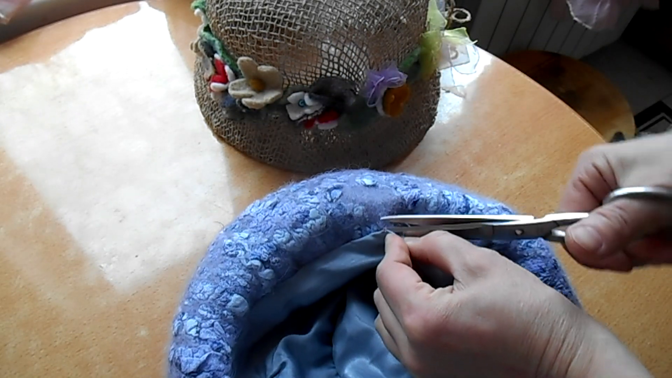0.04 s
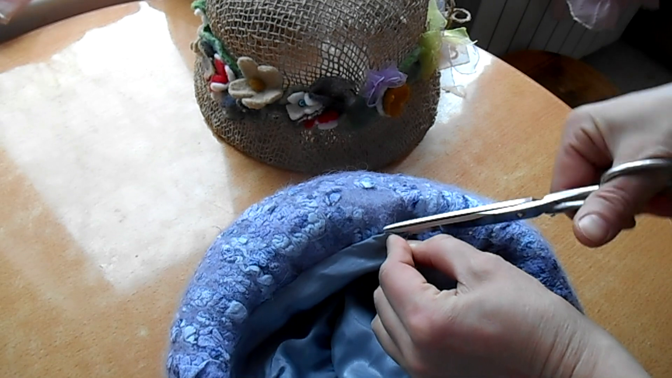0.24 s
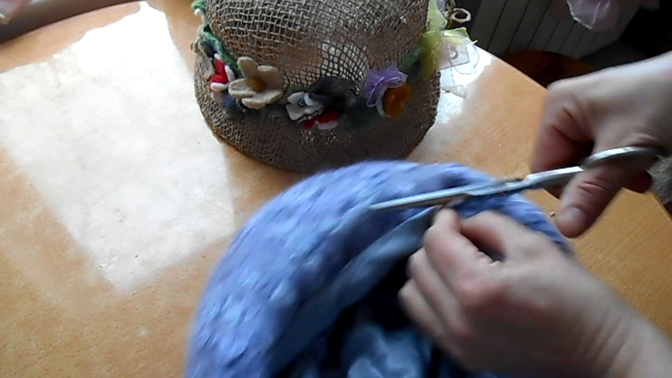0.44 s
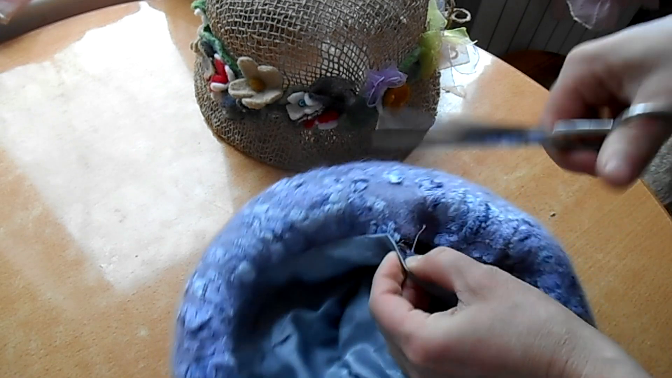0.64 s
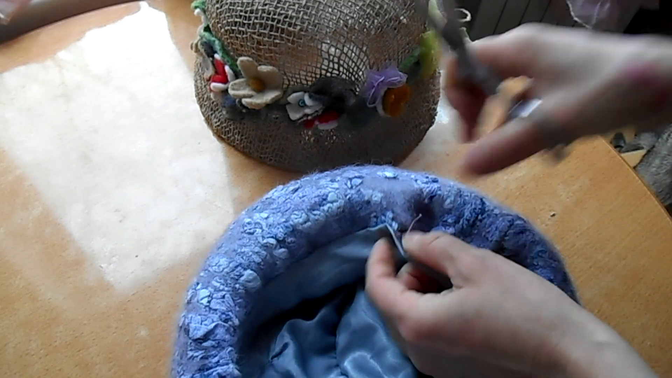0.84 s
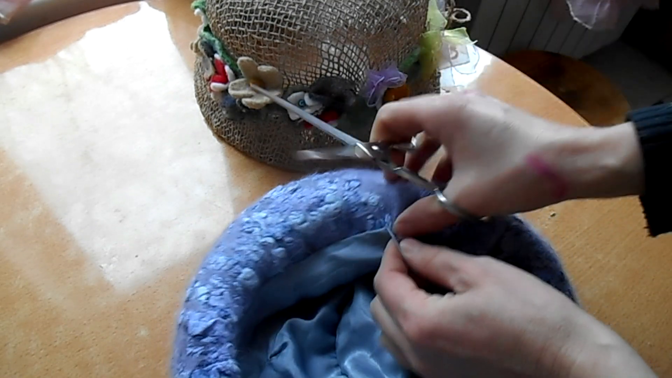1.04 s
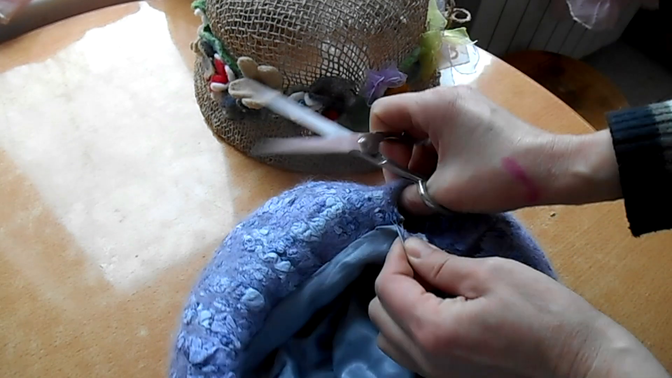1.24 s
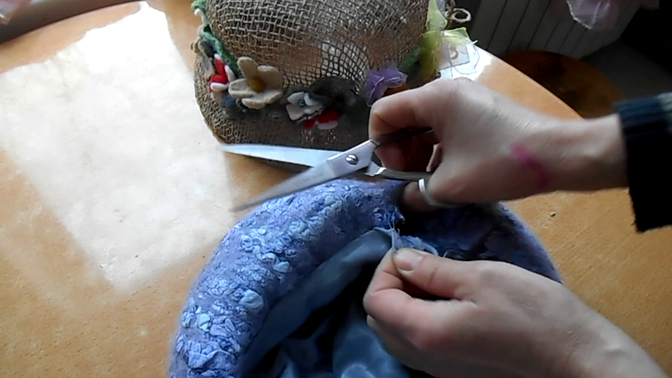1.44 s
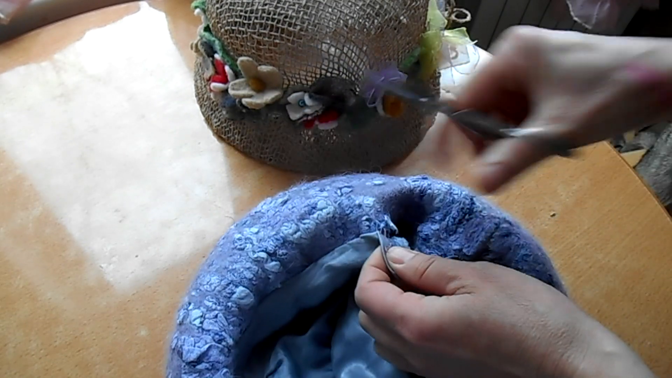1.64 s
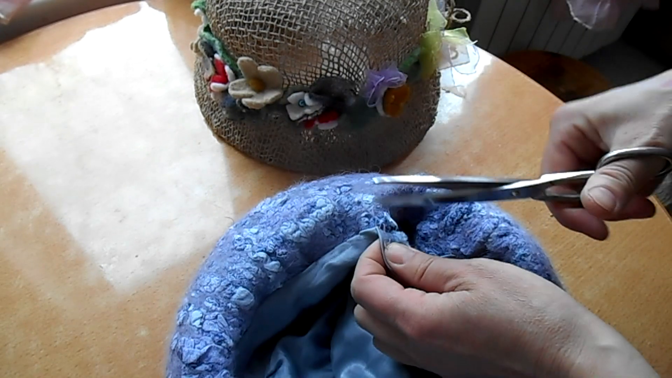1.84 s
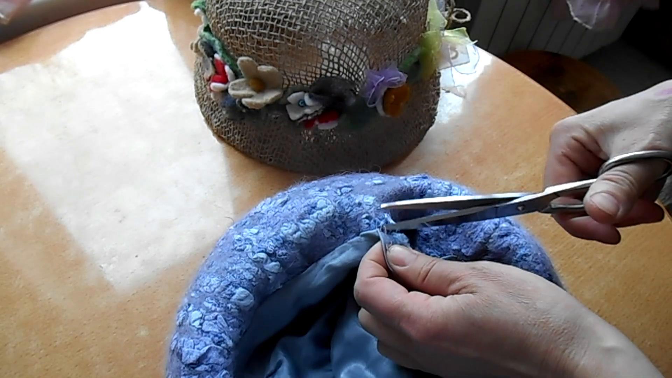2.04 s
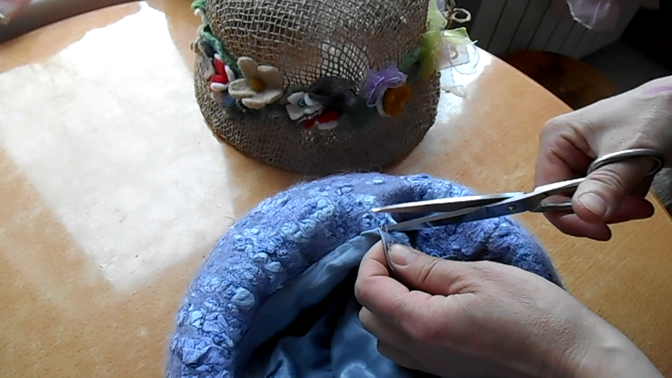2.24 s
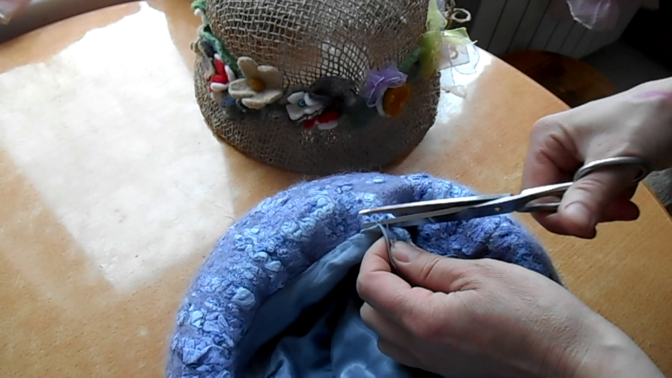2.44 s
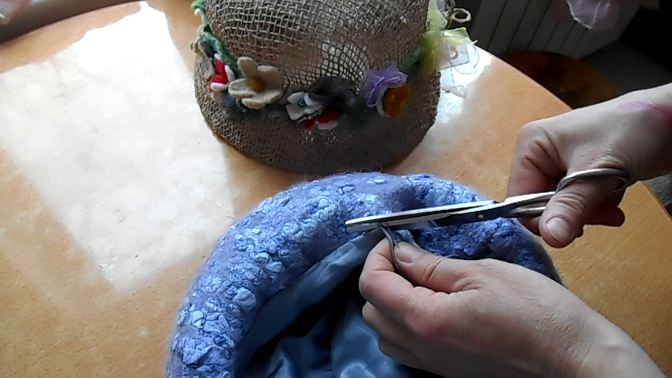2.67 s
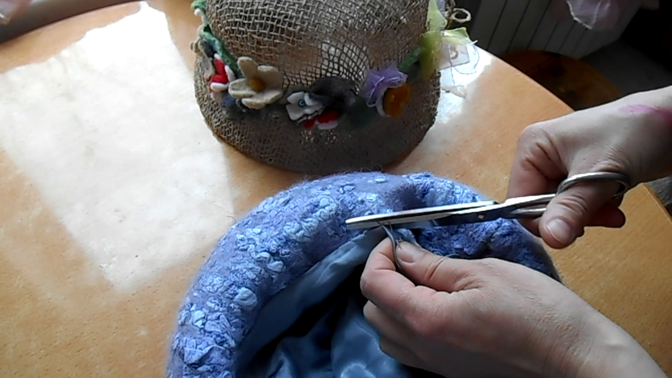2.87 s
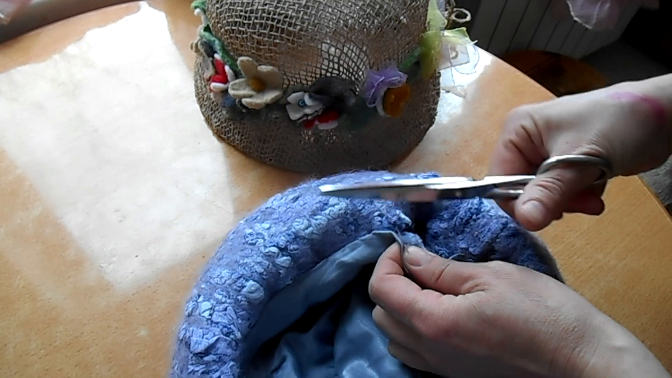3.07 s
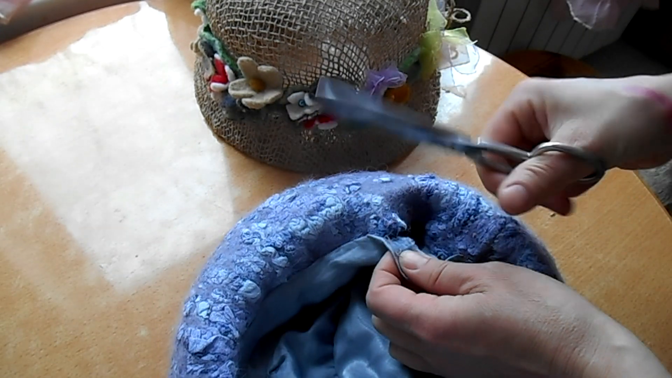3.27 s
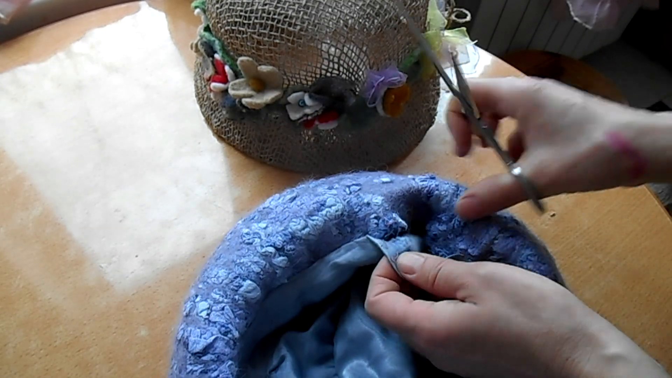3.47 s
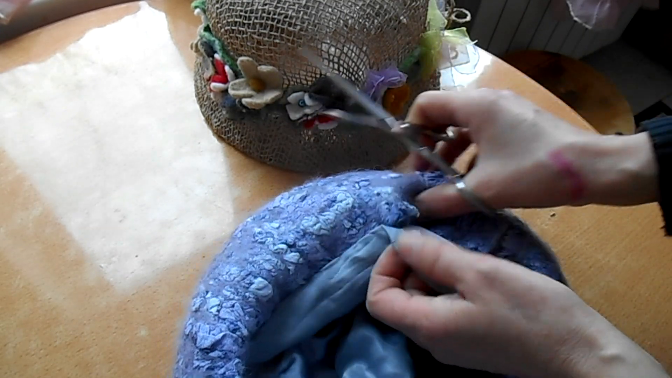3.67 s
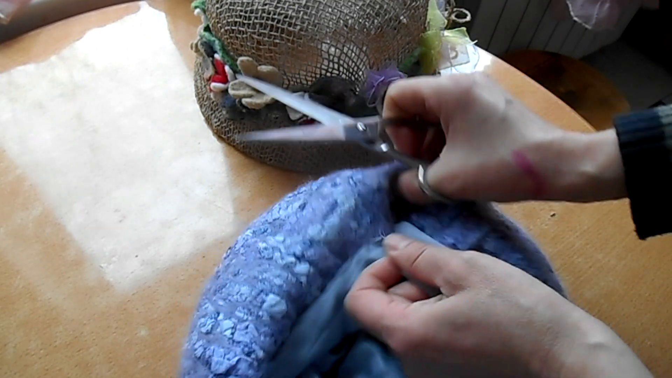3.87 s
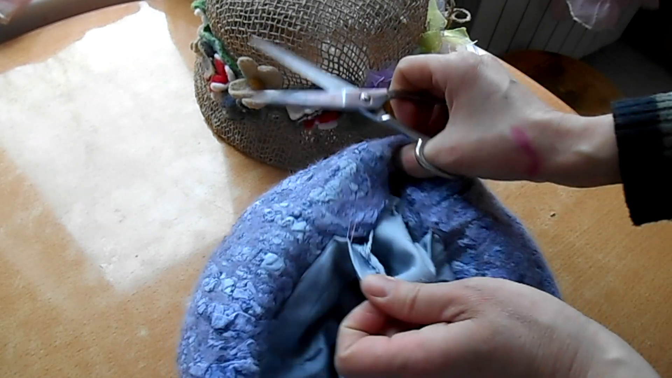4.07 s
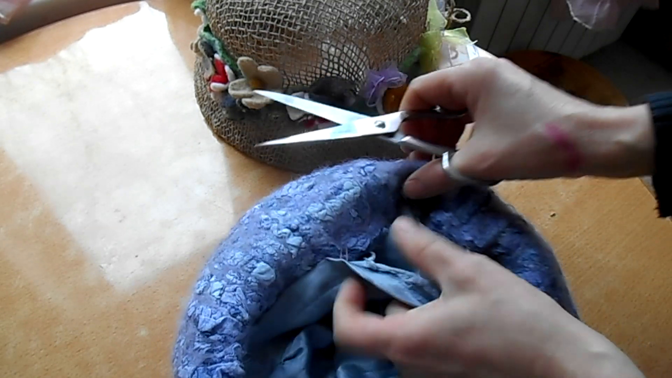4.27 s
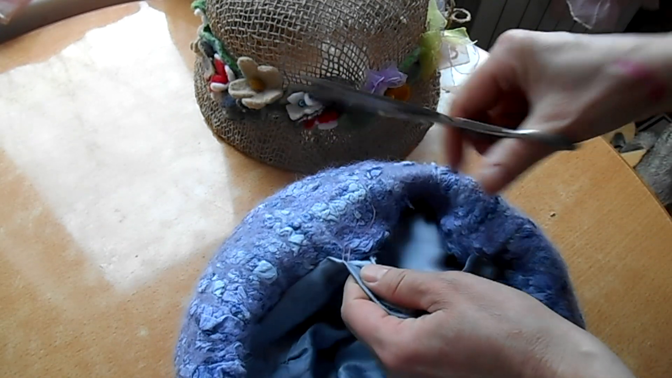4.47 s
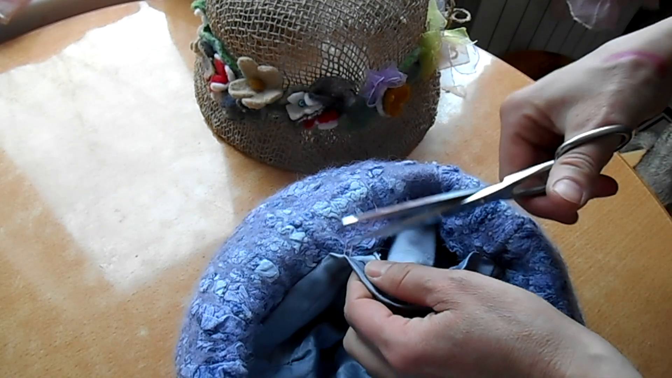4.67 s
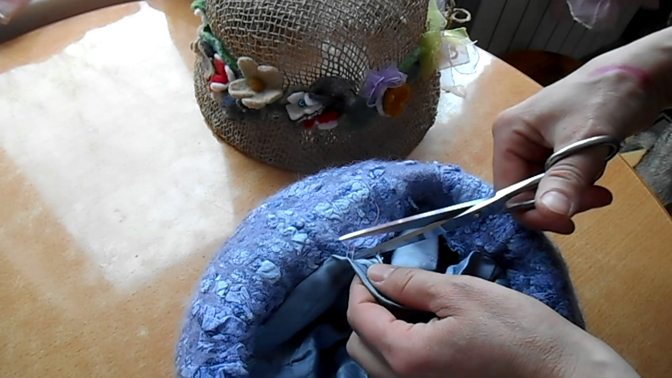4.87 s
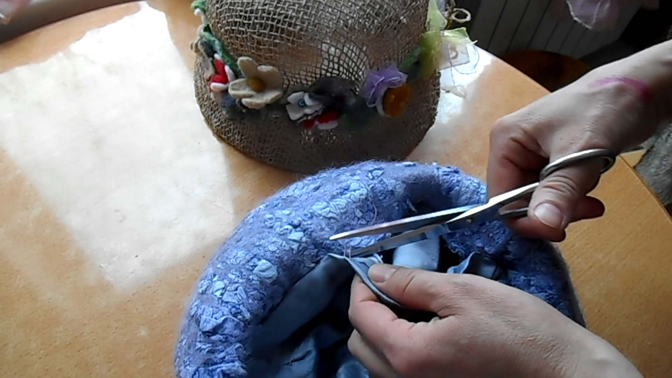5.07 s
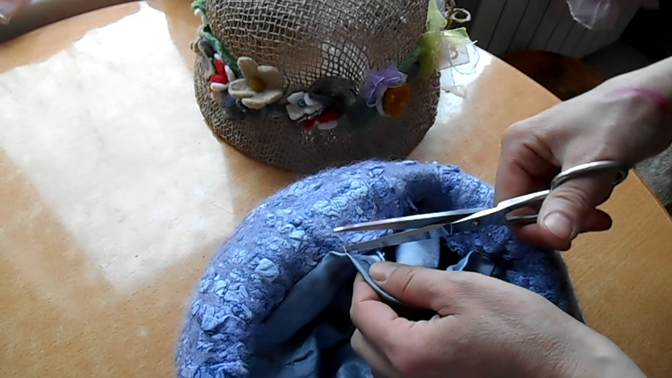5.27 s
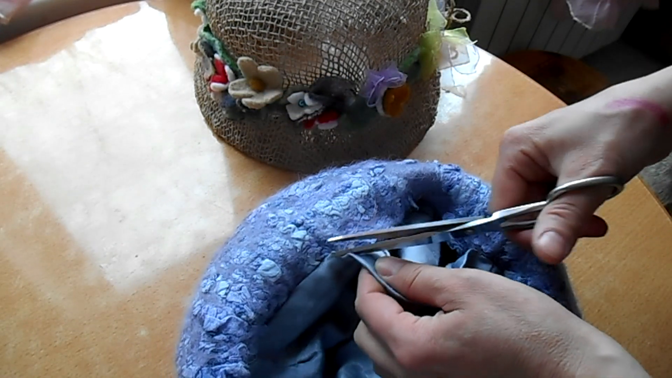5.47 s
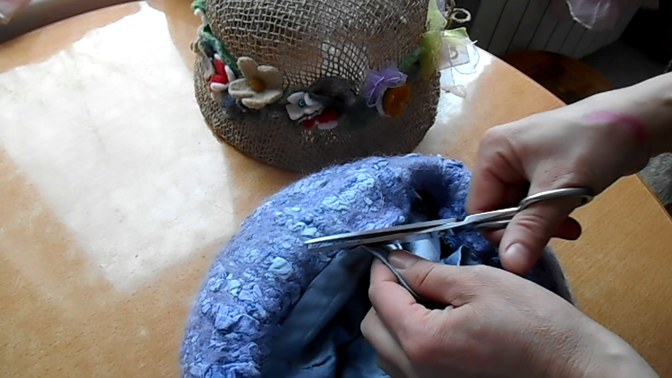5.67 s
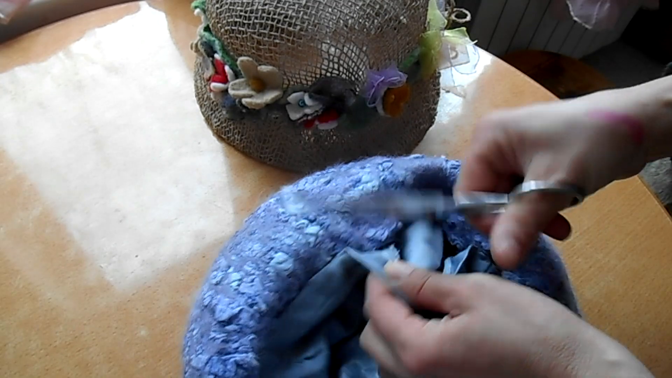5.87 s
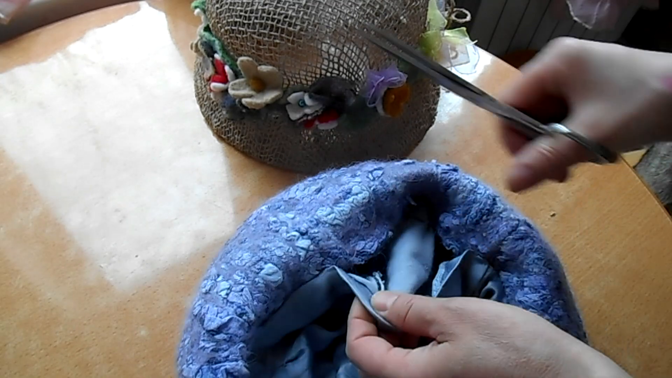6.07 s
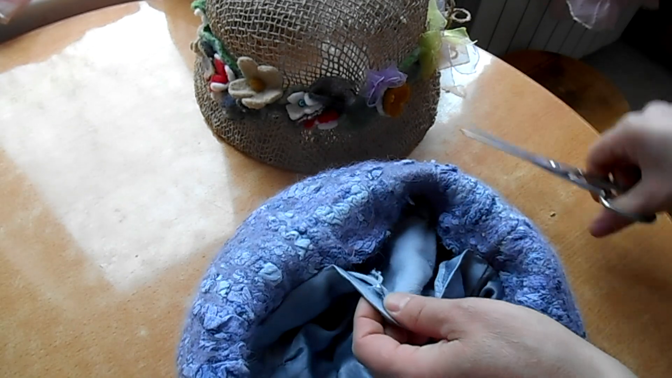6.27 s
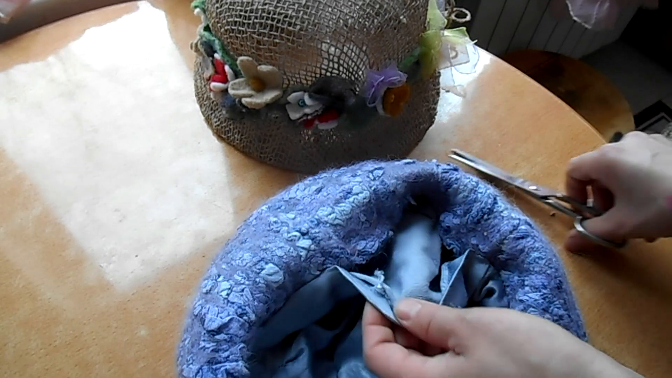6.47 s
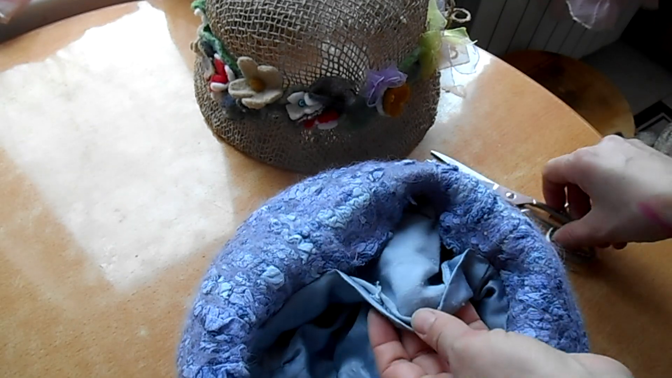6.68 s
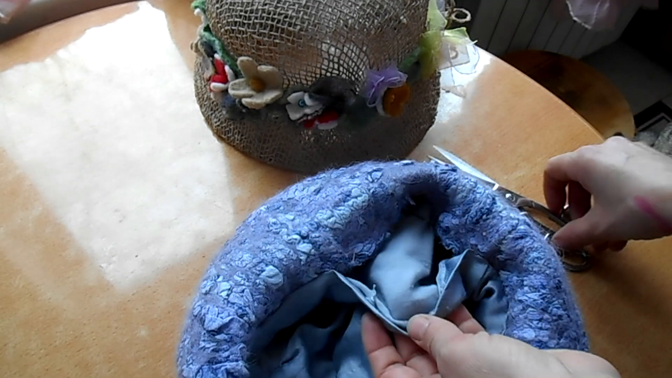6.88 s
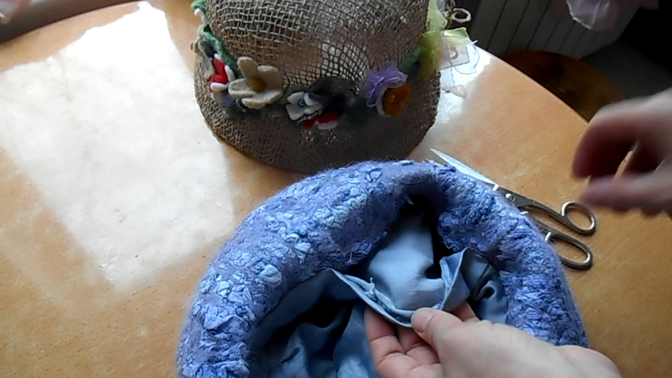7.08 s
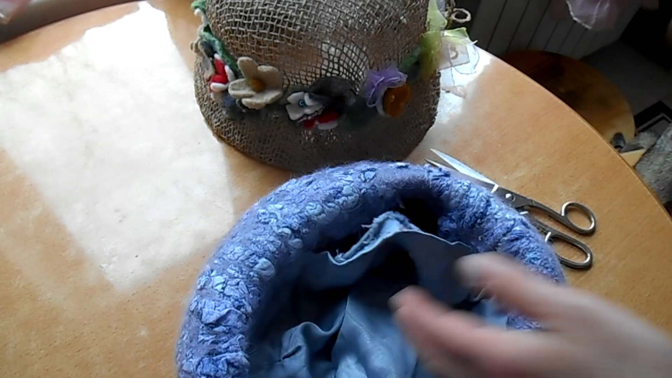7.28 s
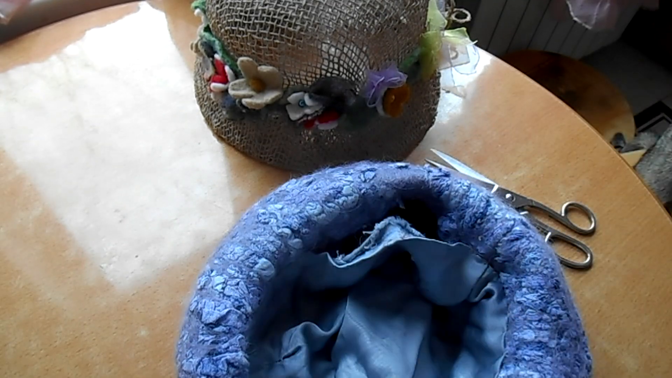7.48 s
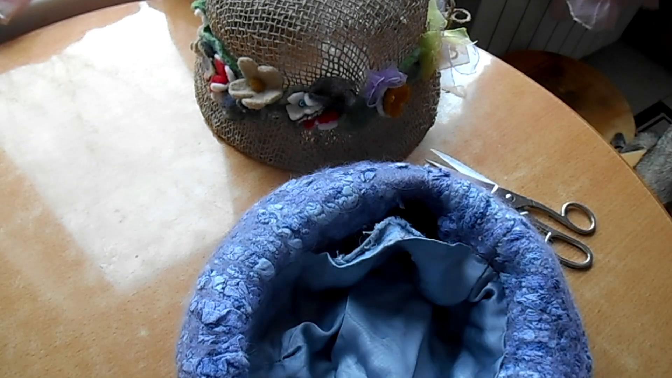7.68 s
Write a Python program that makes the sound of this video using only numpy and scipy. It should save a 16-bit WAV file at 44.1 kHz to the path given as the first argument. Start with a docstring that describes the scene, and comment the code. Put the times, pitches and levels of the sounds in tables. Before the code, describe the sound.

Close microphone, faint background hiss and hum, short indoor reflections. Three crisp scissor snips are spaced several seconds or so apart, with little metallic blade clicks, dry thread ticks, crackling cloth and short felt creaks between them. Finally the scissors are put down: a quick tapping rattle of the points, a light metal scrape, a hard steel-on-wood clack, then a dull scuff and faint rustle.

```python
"""Steel scissors cut the stitches of a felt hat's lining at a wooden table in a small quiet room.
Over a soft background hiss the blades snap shut three times; between the snips threads tick apart,
the loose blades click, and the cloth rustles and creaks in the hand: filtered noise and resonances.
Then the scissors are laid down: the tips bounce, steel slides, the handles drop with a loud clack
that rings decaying modes of steel and wood, and a soft scuff and a last rustle follow."""
import sys
import numpy as np
from scipy import signal
from scipy.fft import rfft, irfft
from scipy.io import wavfile

SR = 44100
rng = np.random.default_rng(int(sys.argv[2]) if len(sys.argv) > 2 else 0)


def dump_mix(stems):
    """Bounce the given channels to the path in sys.argv[1] as a 16-bit WAV at rate SR."""
    frames = np.atleast_2d(stems).T  # one column per channel
    limited = np.clip(frames, -1, 1)  # hard clip at full scale
    pcm = np.round(limited * 32767).astype(np.int16)
    wavfile.write(sys.argv[1], SR, pcm)


N = 340151
TIME = np.arange(N) / SR
RING_TIME = TIME[:SR // 2]  # half a second for each short sound


def undb(db):
    """Decibels to gain."""
    return 10 ** (np.asarray(db) / 20)


def unit(x):
    """Scale to rms 1."""
    return x / np.sqrt(np.mean(x ** 2))


def blow(x, db):
    """Scale a short sound so that its energy, packed into 10 ms, has this level."""
    return x * undb(db) * np.sqrt(SR / 100 / np.sum(x ** 2))


def add(out, s, x):
    """Mix a sound in at a time in seconds."""
    i = int(s * SR)
    out[i:i + len(x)] += x[:N - i]


def colour(x, points):
    """Causal minimum-phase filter through (frequency_hz, gain_db) points."""
    size = 4096
    hz, db = np.transpose(points)
    log_hz = np.log(np.fft.rfftfreq(size, 1 / SR) + 1)
    gain = undb(np.interp(log_hz, np.log(hz), db))
    # folding the cepstrum onto positive times makes the filter causal
    cepstrum = irfft(np.log(gain))[:size // 2]
    cepstrum[1:] *= 2
    impulse_response = irfft(np.exp(rfft(cepstrum, size)))
    return signal.fftconvolve(x, impulse_response)[:len(x)]


def resonate(x, hz, width_hz):
    """One resonance."""
    return signal.lfilter(*signal.iirpeak(hz, hz / width_hz, fs=SR), x)


def resonate_twice(x, hz, width_hz):
    """The same resonance applied twice, for steeper skirts."""
    return resonate(resonate(x, hz, width_hz), hz, width_hz)


def dull(x, hz, order=2):
    """Low-pass."""
    return signal.sosfilt(signal.butter(order, hz, fs=SR, output="sos"), x)


def no_bass(x, hz):
    """High-pass."""
    return signal.sosfilt(signal.butter(4, hz, "high", fs=SR, output="sos"), x)


def fade(t60):
    """Exponential decay, down 60 dB after t60 seconds."""
    return np.exp(-np.log(1000) * RING_TIME / t60)


def burst(t60):
    """Dying noise: a crowd of modes too dense to tell apart."""
    return rng.standard_normal(len(RING_TIME)) * fade(t60)


def ring(modes):
    """Struck modes; each contact point gives them other signs and slightly other pitches."""
    out = np.zeros(len(RING_TIME))
    for hz, db, t60 in modes:
        sign = rng.choice([-1, 1])
        pitch_hz = hz * (1 + .003 * rng.standard_normal())
        out += undb(db) * sign * fade(t60) * np.sin(2 * np.pi * pitch_hz * RING_TIME)
    return out


def contact(duration, grit):
    """A push followed by the tiny slips of two rough surfaces."""
    slips = rng.standard_normal(len(RING_TIME)) * np.exp(-(RING_TIME / duration) ** 2)
    return grit * blow(slips, 0) + blow(signal.unit_impulse(len(RING_TIME)), 0)


def swipe(duration):
    """Friction that swells and dies away, strongest two durations in."""
    return rng.standard_normal(len(RING_TIME)) * np.exp(-(RING_TIME / duration - 2) ** 2)


# every hand movement swells and dies alike: share of its length spent rising, dB under the peak at both ends
RISE_SHARE, EDGE_DB = .52, 18.5


def swell(peak_s, db, length):
    """Gain of one hand movement: an even rise in dB to its peak, then an even fall."""
    before = (peak_s - TIME) / RISE_SHARE
    after = (TIME - peak_s) / (1 - RISE_SHARE)
    away = np.maximum(before, after) / length
    return undb(db - EDGE_DB * np.minimum(away, 10))


def swells(rows):
    """Gain of several movements, whose powers add."""
    return np.sqrt(sum(swell(*row) ** 2 for row in rows))


def room(x, wet_db):
    """The table and near walls answer at once; the treble dies first."""
    tail = dull(burst(.4), 2800) * undb(-1.0) + burst(0.19)
    tail = tail * (1 - np.exp(-RING_TIME / 0.0012))  # soft onset
    tail = tail / np.sqrt(np.sum(tail ** 2))
    return x + undb(wet_db) * signal.fftconvolve(x, tail)[:N]


# tone of the background hiss: frequency_hz, gain_db
AIR_TONE = [(25, 2.5), (45, -0.5), (65, -0.5), (100, -5.5), (170, 2), (400, -3.5), (680, -6.5), (1000, 1),
            (1500, -3.5), (2200, -3), (2700, -2), (4400, -11.5), (8500, -13.5), (10500, -19.5),
            (12800, -26.5), (14000, -36.5), (15000, -48.5)]
# hums in the background: pitch_hz, width_hz (before widening), relative_level_db
BACKGROUND_HUMS = [(240.2, 21, -3.5), (532.3, 42.5, 2), (1118, 56, -1), (1470, 120, 0.5), (1793, 120, -1.5),
                   (2523, 120, -2.5), (3686, 80, -5), (11040, 70, -11.5)]


def air():
    """Steady background hiss with a few soft hums and a thin whine, all resonant or coloured noise."""
    hiss = unit(colour(rng.standard_normal(N), AIR_TONE))
    hums = np.zeros(N)
    for hz, width, db in BACKGROUND_HUMS:
        hums += undb(db) * unit(resonate_twice(rng.standard_normal(N), hz, 1.43 * width))
    return undb(-56.0) * hiss + undb(-65.5) * hums


# the hat shifts on the table: peak_s, level_db, length_s
HAT_SHIFTS = [(.15, -61, 0.22), (.39, -59, 0.73), (1.05, -67.5, 1.0), (1.78, -56, 0.43), (2.47, -54, 0.15)]


def rumble():
    """The hat shifts on the table with a low rumble."""
    low_noise = no_bass(dull(rng.standard_normal(N), 85, order=3), 22)
    return unit(low_noise) * swells(HAT_SHIFTS)


# the lining is drawn through the fingers or the blades: peak_s, level_db, length_s, crackle_share (0-1)
LINING_STROKES = [(0.66, -53.5, 0.25, 0.3), (.94, -56.5, .2, .3), (1.172, -51.5, .27, 0.4),
                  (1.33, -57, .2, .5), (1.558, -52.5, 0.21, 0.27), (1.87, -62.5, .3, .3),
                  (2.57, -54, .32, 0.74), (3.202, -59, 1.3, .3), (3.758, -51.5, 0.5, .1),
                  (3.91, -50.5, .2, 0.16), (4.084, -43.5, 0.29, 0.2), (4.27, -54.5, 0.27, 0.15),
                  (4.53, -54.5, 0.77, .1), (5.656, -48, 0.42, 0.64), (6.0, -58.5, 3.6, 0.15),
                  (7.455, -53.5, 1.4, 0.06)]
# tone of the rubbed lining: frequency_hz, gain_db
CLOTH_TONE = [(200, -5), (800, 2), (3000, -0.5), (4500, 0.5), (7000, 1.5), (9500, -5), (12000, -18),
              (15000, -26.5)]
CATCHES_PER_S = 450  # fibres that catch in the lining


def cloth():
    """Countless fibres slip as a soft hiss, while a few catch and crackle."""
    powers = np.array([swell(s, db, length) ** 2 for s, db, length, _ in LINING_STROKES])
    share = np.array([row[3] for row in LINING_STROKES])
    catches = (rng.random(N) < CATCHES_PER_S / SR) * rng.standard_normal(N)
    hiss = unit(colour(rng.standard_normal(N), CLOTH_TONE)) * np.sqrt((1 - share) @ powers)
    crackle = unit(colour(catches, CLOTH_TONE)) * np.sqrt(share @ powers)
    return hiss + crackle


# the stiff felt and lace creak when pulled: peak_s, level_db, length_s
FELT_PULLS = [(.382, -44, .009), (.61, -59, .4), (4.005, -44.5, 0.15), (4.05, -43.5, .05),
              (4.12, -48, 0.062), (4.28, -56.5, 1.0), (5.65, -58, 0.37), (5.82, -46.5, .06)]
# tone of the creak: frequency_hz, gain_db
CREAK_TONE = [(100, -15), (300, -3), (800, 1.5), (1400, -2.5), (2200, -7), (3000, 3), (3800, -10.5),
              (8000, -25), (15000, -40)]
SLIPS_PER_S = 2500


def creak():
    """Dense little slips in the pulled felt."""
    slips = (rng.random(N) < SLIPS_PER_S / SR) * rng.standard_normal(N)
    return unit(colour(slips, CREAK_TONE)) * swells(FELT_PULLS)


# threads part: start_s, level_db, duration_s
THREAD_TICKS = [(1.199, -50, .001), (1.2368, -39, 0.0007), (1.293, -45, 0.00055), (1.303, -43.5, 0.0009),
                (1.3345, -34, 0.00066), (1.3683, -41, 0.0009), (2.482, -54.5, 0.0023), (2.755, -48, 0.0059),
                (3.993, -43, 0.0006), (4.049, -44.5, 0.004), (5.561, -46.5, 0.0023), (5.636, -43.5, 0.0012),
                (5.655, -46, 0.0014)]
# tone of a parting thread: frequency_hz, gain_db
THREAD_TONE = [(200, -17), (1000, -4), (3000, 2.5), (6200, 4), (9000, -0.5), (12000, -15), (15000, -25)]


def threads():
    """Each thread gives way with one dry tick."""
    out = np.zeros(N)
    for s, db, duration in THREAD_TICKS:
        tick = colour(contact(duration, grit=0.73), THREAD_TONE)
        add(out, s, blow(tick, db))
    return out


# loose blades rub and click: peak_s, level_db, main_ring_hz, main_ring_gain_db, contact_s
BLADE_CLICKS = [(0.429, -41.5, 6900, -6, 0.0038), (.466, -38, 7350, 1, 0.00071),
                (.625, -52, 2920, 10, 0.0084), (.663, -43.5, 4600, 0, .008),
                (1.767, -48.5, 9770, -2, 0.0061), (3.02, -40.5, 3200, -2, 0.00069),
                (3.291, -50, 4470, 2, .003), (3.496, -48.5, 9800, -4, 0.0055),
                (5.8188, -40, 5900, -9, 0.0041), (5.875, -47, 4100, 3, 0.00069),
                (6.014, -46.5, 7100, 4, 0.0037)]
# free ring of the steel, also heard in the knocks and the slide: pitch_hz, gain_db, t60_s
STEEL_MODES = [(2525, 1, .3), (2674, -8, 0.32), (3660, 5, 0.19), (3800, 0, .22), (5300, -0.5, .2),
               (6210, -3, .2), (6350, -4.5, .15), (7670, -3.5, .2), (8270, -5.5, .2), (9940, -1.5, 0.092),
               (10300, -7.5, .18), (11400, -9.5, 0.093), (12200, -12.5, .15)]
# tone of struck or rubbed steel: frequency_hz, gain_db
STEEL_TONE = [(600, -19.5), (2100, -18), (2600, 6.5), (3200, -6), (3800, 0.5), (4600, -6), (6300, 0),
              (8300, -3), (9000, -10), (9900, -3), (11100, -18.5), (12200, -9.5), (15000, -42)]


def pivot():
    """Slack blades scrape and tap each other, ringing lightly."""
    out = np.zeros(N)
    for s, db, hz, main_db, duration in BLADE_CLICKS:
        force = swipe(duration)
        tap = blow(colour(force, STEEL_TONE), 0) + blow(resonate_twice(force, hz, 600), main_db)
        modes = ring(STEEL_MODES) + 2.8 * ring([(7750, 0, .16)])
        singing = signal.fftconvolve(force, modes)[:len(force)]
        add(out, s - 2 * duration, blow(tap, db) + blow(singing, db - 9.5))
    return out


# the tips touch the table and bounce, each flight shorter than the last
TIPS_S, FIRST_FLIGHT_S, RESTITUTION = 6.4564, .0525, .67
TIP_STEEL_DB, TIP_BOARD_DB, TIP_THUMP_DB, TIP_TOP_HZ = -14.5, -30, -25, 1590
STEEL_LOSS_DB, WOOD_LOSS_DB = 8, 6.5  # lost each time the number of contacts doubles


def bounces(count):
    """The knocks of the bouncing tips, ever closer and weaker."""
    rows, s = [], TIPS_S
    for k in range(count):
        doublings = np.log2(k + 1)
        steel_db = TIP_STEEL_DB - doublings * STEEL_LOSS_DB
        wood_loss = doublings * WOOD_LOSS_DB
        rows.append((s, steel_db, TIP_BOARD_DB - wood_loss, TIP_THUMP_DB - wood_loss, TIP_TOP_HZ))
        s += FIRST_FLIGHT_S * RESTITUTION ** k
    return rows


# the handles drop and settle: start_s, steel_db, board_db, thump_db, board_top_hz
HANDLE_KNOCKS = [(6.8025, -26, -15.5, -21, 1530), (6.8207, -32.5, -14.5, -45, 1520),
                 (6.8314, -8, -5.5, -24, 6100), (6.864, -25.5, -17, -38, 5000),
                 (6.900, -45, -30, -36, 4000), (6.993, -50, -38.5, -38, 2000)]
# table top bending as a whole: pitch_hz, gain_db, t60_s
THUMP_MODES = [(146, -12.5, 0.42), (168, -14.5, 0.32), (243.3, -5, 0.25), (273.8, 0, 0.35), (310, -8, 0.11),
               (376.5, -3, 0.35), (403, -7.5, 0.26)]
# stiff upper modes of the table top: pitch_hz, gain_db, t60_s
BOARD_MODES = [(684, -7, 0.31), (834, -4.5, 0.16), (862, -3.5, 0.36), (996, -8, 0.43), (1180, 1.5, 0.18),
               (1244, -1, 0.18), (1370, -4, 0.18), (1464, -2.5, 0.22), (1570, -4.5, .22),
               (1644, -0.5, 0.18), (2003, 3.5, 0.16), (2310, -6, .17), (2610, 3, 0.089), (2770, 5, 0.18),
               (3380, 1, 0.28), (4230, -8, 0.13), (6030, 8.5, 0.079)]
# tone of the wood, also heard in the scuff: frequency_hz, gain_db
BOARD_TONE = [(150, -20.5), (550, -16), (720, -1), (1400, 3.5), (1800, -1.5), (2700, 1), (5500, 3),
              (8000, -17), (14000, -18)]


def knocks():
    """Every knock rings steel and wood; a harder contact reaches higher modes of the board."""
    out = np.zeros(N)
    for s, steel_db, board_db, thump_db, top_hz in bounces(count=6) + HANDLE_KNOCKS:
        # chatter against the wood smears each steel mode into a narrow band
        clank = np.zeros(len(RING_TIME))
        for hz, db, t60 in STEEL_MODES:
            clank += undb(db) * blow(resonate_twice(burst(t60), hz, 260), 0)
        steel = blow(clank, -7)
        steel += blow(colour(burst(0.022), STEEL_TONE), -2.5)
        steel += blow(colour(burst(0.23), STEEL_TONE), -12.5)
        board = blow(ring(BOARD_MODES), -7.5) + blow(colour(burst(0.17), BOARD_TONE), 1.5)
        wood = blow(dull(board, top_hz, order=3), board_db) + blow(ring(THUMP_MODES), thump_db)
        add(out, s, undb(steel_db) * steel + no_bass(wood, 113))
    # once the hand lets go, the hardest knock sets the blade tips singing
    hardest = max(HANDLE_KNOCKS, key=lambda row: row[1])
    tips = ring([(7666, 1.5, 0.09), (9850, -4.5, .06), (12150, -7.5, 0.055)])
    add(out, hardest[0], blow(tips, -11.5))
    return out


# steel slides on the table: peak_s, level_db (before the two parts are mixed), length_s
STEEL_SLIDES = [(6.665, -41.5, 0.22)]


def slide():
    """Sliding on the wood keeps the steel ringing."""
    scrape = rng.standard_normal(N)
    rub = unit(colour(scrape, STEEL_TONE))
    singing = unit(signal.fftconvolve(scrape, ring(STEEL_MODES))[:N])
    return (undb(-2) * rub + undb(-3) * singing) * swells(STEEL_SLIDES)


# a soft scuff on wood: peak_s, level_db, length_s
WOOD_SCUFFS = [(7.647, -43.5, 0.13)]


def scuff():
    """Dull friction noise with the tone of the wood."""
    friction = colour(rng.standard_normal(N), BOARD_TONE)
    return unit(dull(friction, 1800, order=1)) * swells(WOOD_SCUFFS)


# blades snap shut: start_s, level_db, lowest_resonance_hz, its_gain_db, brightness_top_hz,
# ring_db (relative to level_db), contact_s, grip_widening (factor on the resonance widths)
BLADE_SNIPS = [(0.4474, -12.5, 2920, -4, 8750, -12, 0.0013, 1.72),
               (3.2033, -20, 2854, 4, 11900, -14.5, 0.0015, 1.09),
               (5.8834, -17.5, 2490, 0.5, 10400, -18, 0.00052, 1.08)]
# upper resonances of the closed blades, damped by the hand: pitch_hz, width_hz (before widening), gain_db
SHUT_MODES = [(3850, 570, -2), (6300, 820, -0.5), (6890, 1040, 1.5), (8600, 430, -3.5), (9770, 700, -0.5),
              (12250, 760, -4.5)]


def snips():
    """The blades hit their stop; the hand kills all but one thin ring within milliseconds."""
    out = np.zeros(N)
    for s, db, low_hz, low_db, top_hz, ring_db, duration, grip in BLADE_SNIPS:
        force = contact(duration, grit=1.0)
        crack = np.zeros(len(RING_TIME))
        for hz, width, gain_db in [(low_hz, 430, low_db)] + SHUT_MODES:
            crack += blow(resonate_twice(force, hz, 1.23 * grip * width), gain_db)
        body = no_bass(dull(force, 5000), 121)
        crack = dull(crack, top_hz, order=3) + blow(body, -11.0)
        thin_ring = resonate(burst(0.068), 7940, 450)
        add(out, s, blow(crack, db) + blow(thin_ring, db + ring_db))
    return out


def scene():
    """All sources in the room."""
    background = air() + rumble() + cloth() + creak()
    cut_threads = room(threads(), wet_db=-15.5)
    laid_down = room(knocks() + slide() + scuff(), wet_db=-10.5)
    blades = room(pivot() + snips(), wet_db=-15.0)
    return (background + cut_threads + laid_down + blades)[None]


def record(dry):
    """Round off the loudest peaks, then cut the top above 15 kHz."""
    rounded = dry / (1 + dry ** 6) ** (1 / 6)
    return signal.sosfilt(signal.ellip(8, .2, 70, 15000, fs=SR, output="sos"), rounded)


dry = scene()
out = record(dry)
dump_mix(out)
```